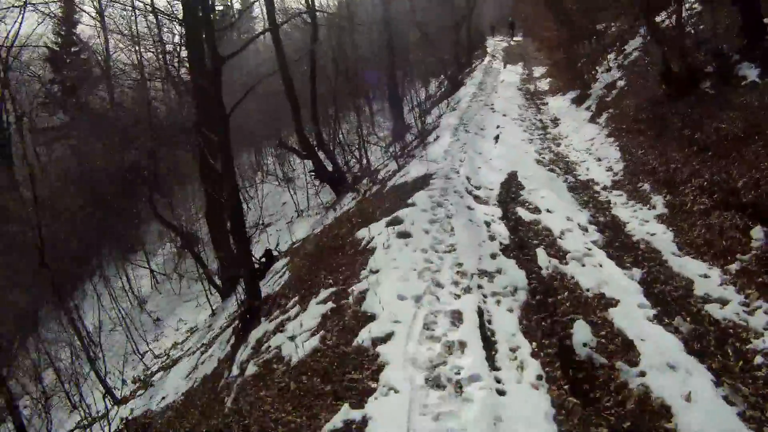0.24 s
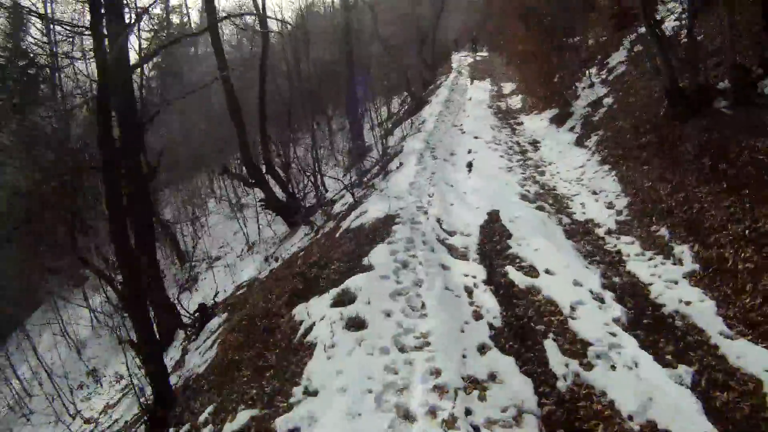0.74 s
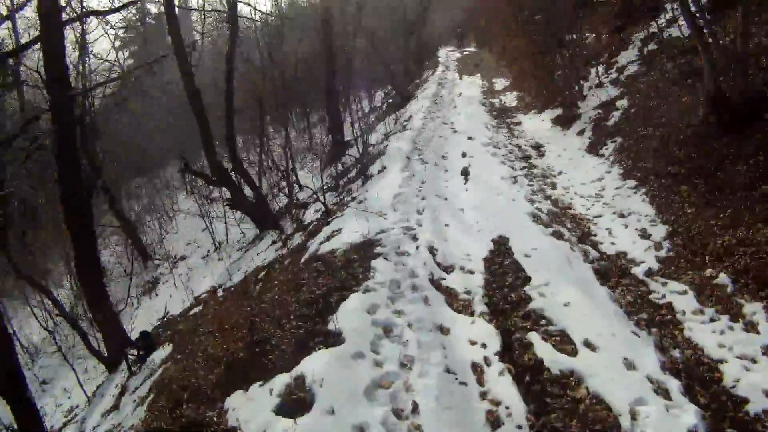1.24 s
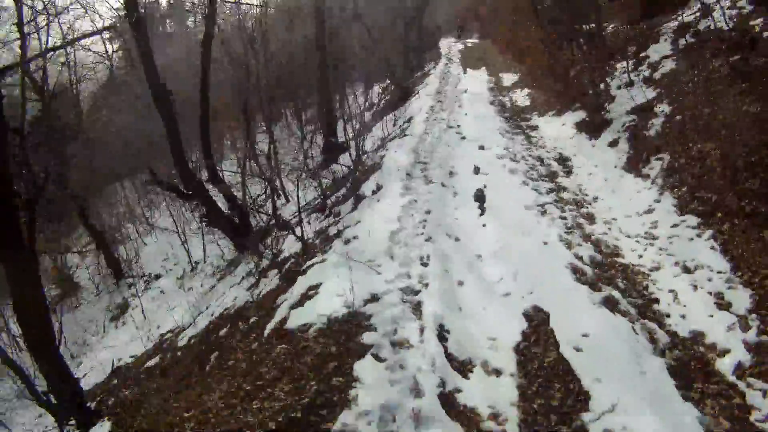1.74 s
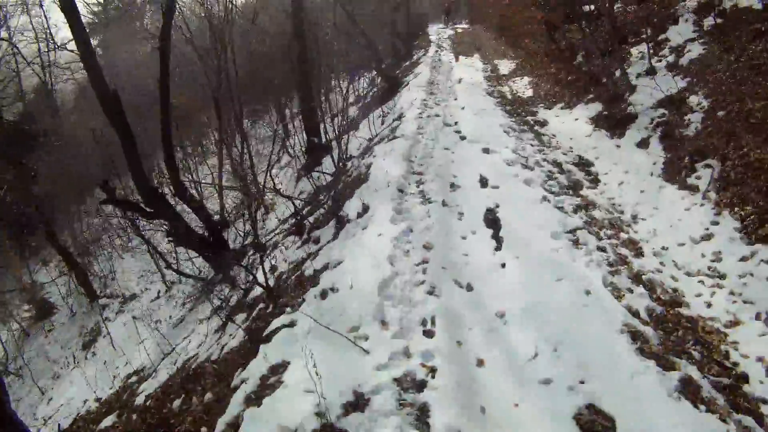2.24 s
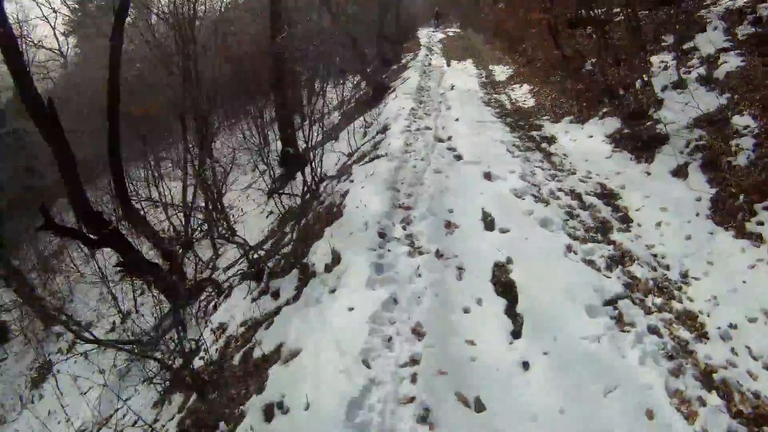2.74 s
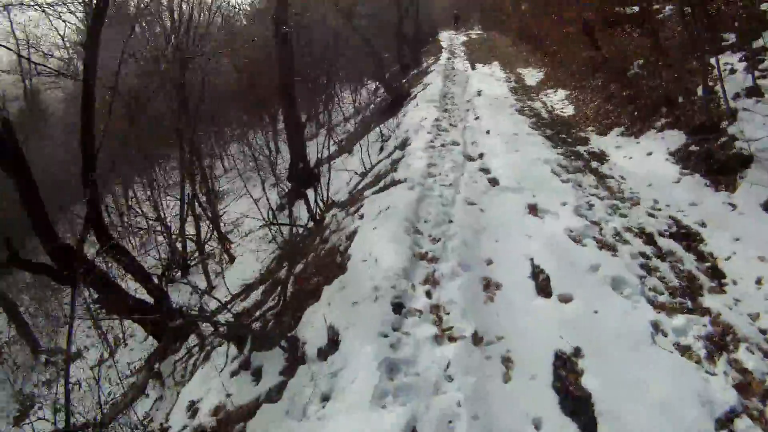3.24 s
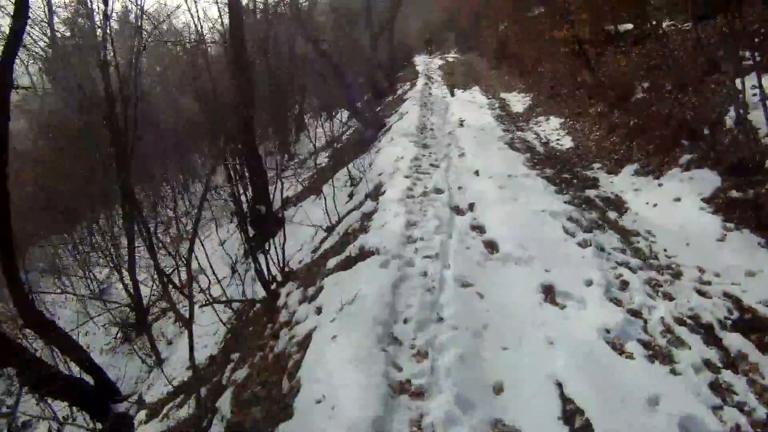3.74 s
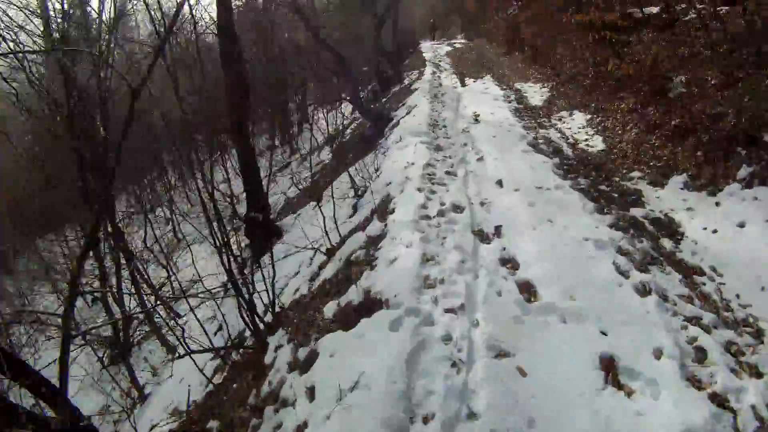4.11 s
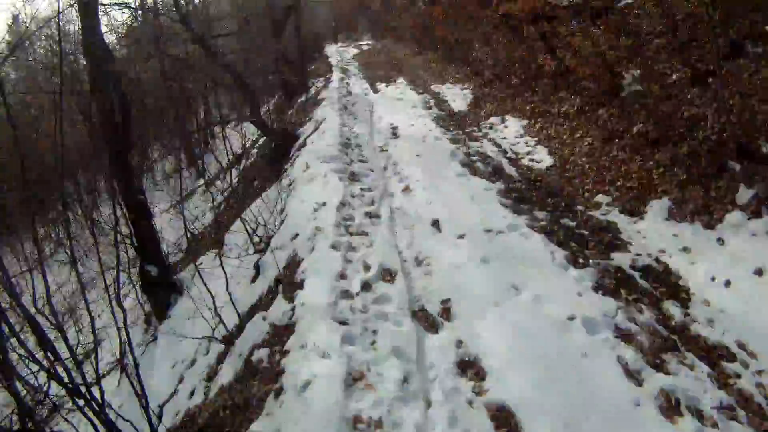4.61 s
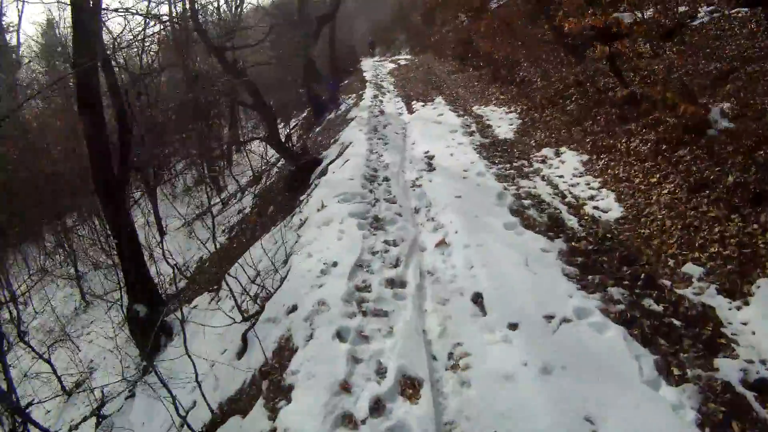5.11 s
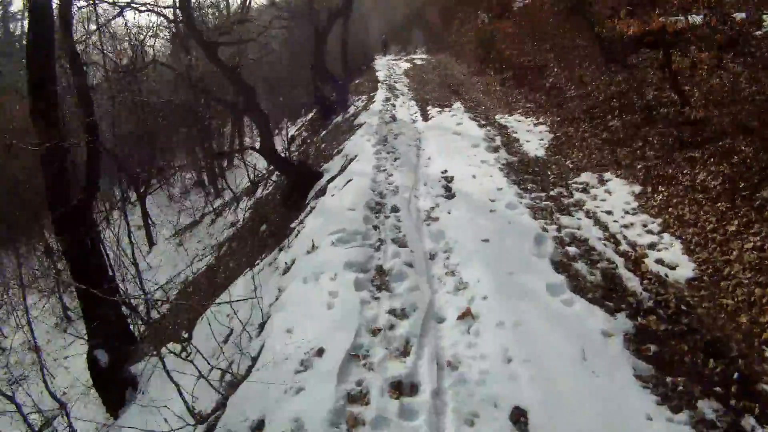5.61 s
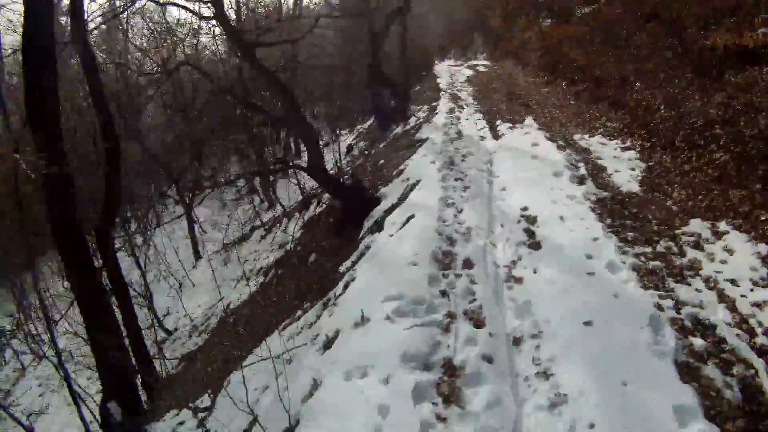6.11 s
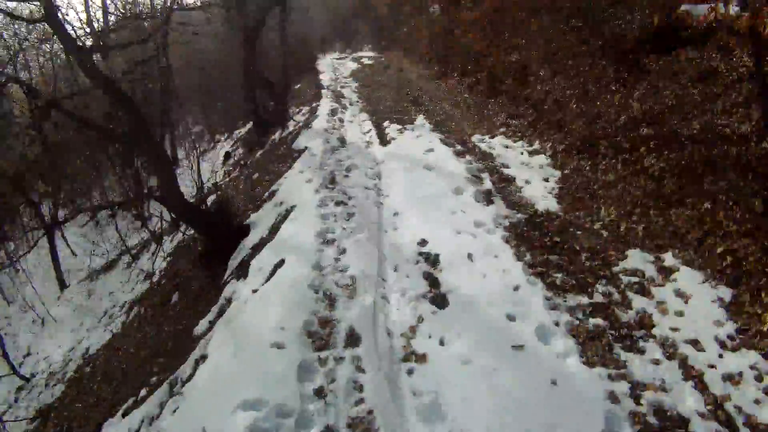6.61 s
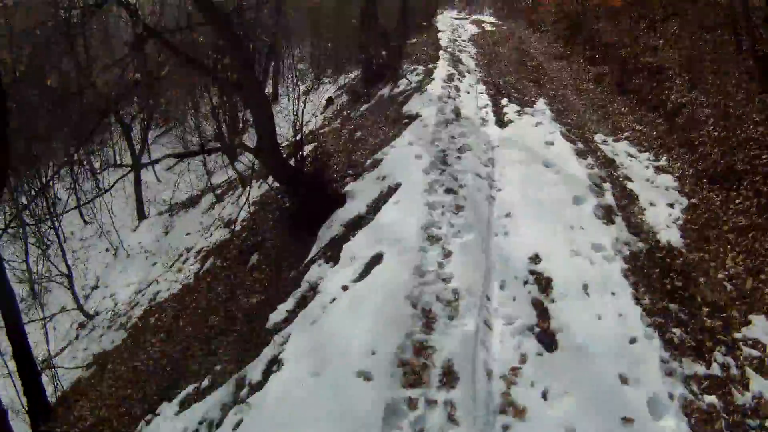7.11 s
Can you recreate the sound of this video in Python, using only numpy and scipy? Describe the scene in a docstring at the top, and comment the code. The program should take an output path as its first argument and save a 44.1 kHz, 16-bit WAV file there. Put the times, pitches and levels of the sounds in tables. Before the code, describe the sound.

Close, boxy and muffled sound from a bike-mounted camera: deep fluttering rumble and a soft rolling drone, grainy snow crunch with a thin crystal hiss that swells and eases. Small dry clicks and short rattles scatter throughout. Around four seconds the shaking is gentler; later it grows rougher, with padded knocks and thumps of the frame near the end.

```python
"""A low shudder and the crunch of tyres: a bicycle rolls on thin, trodden snow, heard inside a closed plastic case.
Shaped low noise shakes the camera's mount and drones through the frame; random cracks make crunch and hiss.
Bits of grit tick and scrape, and a loose fitting clacks through damped modes.
Later the frame knocks dully, most often towards the end, as padded blows ring its low modes."""
import sys
import numpy as np
from scipy import signal
from scipy.fft import rfft, irfft, next_fast_len
from scipy.io import wavfile
from scipy.ndimage import uniform_filter1d

SR = 44100
rng = np.random.default_rng(int(sys.argv[2]) if len(sys.argv) > 2 else 0)


def generate_wav(signal):
    """Clip the signal to [-1, 1] and save it as 16-bit WAV at the path in sys.argv[1]."""
    frames = np.transpose(np.atleast_2d(signal))
    scaled = np.clip(frames, -1, 1) * 32767
    pcm = np.round(scaled).astype(np.int16)
    wavfile.write(sys.argv[1], SR, pcm)


N = 324576
T = np.arange(N) / SR
SIZE = 2 * next_fast_len(N // 2 + SR)  # padded, so that filter tails do not wrap round
FREQ = np.arange(SIZE // 2 + 1) * SR / SIZE

# Event and mode levels below are relative: layer gains and the case still act on them.
# bumps in the trail: [full strength from t/s, length/s, sway level/dB, bounce relative to sway/dB]
BUMPS = [(0.0, 0.1, -39.5, -0.5), (0.178, 0.052, -40, 0.5), (0.485, 0.056, -44, -7),
         (0.556, 0.11, -45.5, 0.5), (0.91, 0.038, -42, -5.5), (1.094, 0.039, -41, -8),
         (1.309, 0.13, -41, 3), (1.498, 0.054, -43.5, -1), (1.738, 0.031, -41, -7.5),
         (1.919, 0.082, -39, 0.5), (2.13, 0.27, -45.5, -0.5), (2.547, 0.079, -39, 5), (2.7, 0.11, -44, -1),
         (2.867, 0.083, -42.5, -1), (3.231, 0.11, -40.5, 0), (3.453, 0.055, -45, -0.5),
         (3.682, .12, -42, -3.5), (4.007, 0.044, -52.5, 4), (4.287, 0.11, -52.5, 1),
         (4.475, 0.056, -39.5, -1), (4.703, 0.076, -44.5, 3.5), (4.82, 0.091, -48.5, 1),
         (5.056, .1, -51.5, 4), (5.317, 0.13, -47, 0.5), (5.633, 0.1, -44.5, -4), (5.97, 0.18, -42.5, -6),
         (6.346, 0.091, -37.5, -3.5), (6.52, 0.055, -42.5, -5.5), (6.68, 0.091, -40.5, 0),
         (6.797, .25, -36.5, -1.5), (7.108, 0.095, -43.5, 0)]
BUMP_ATTACK_S, BUMP_RELEASE_S = 0.037, 0.035
SMOOTH_SWAY_DB, SMOOTH_BOUNCE_DB = -53, -55.5  # shaking on the even snow, before the mount's gains
# spectrum of the swaying camera: [f/Hz, level/dB]
SWAY_COLOUR = [(4, -17), (12, 12.5), (19, 2.5), (28, -4.5), (45, -7.5), (58, -19), (80, -19.5), (200, -48),
               (600, -62)]
# spectrum of the bouncing mount: [f/Hz, level/dB]
BOUNCE_COLOUR = [(30, -23), (55, -5), (68, -0.5), (77, 3), (90, -9.5), (110, -21), (150, -27.5),
                 (260, -34.5), (600, -45.5), (2000, -92)]
# dull drone of the rolling wheels, carried up through the frame: [f/Hz, level/dB]
DRONE_COLOUR = [(60, 0.5), (130, 3.5), (260, -4.5), (450, -6), (800, -8), (1300, -17.5), (3000, -51)]
# how hard the tyres bite into the snow: [t/s, crunch level/dB, crystal hiss level/dB]
BITE = [(0.0, -55.5, -65), (0.09, -49, -58), (0.33, -56, -66.5), (0.66, -60.5, -68), (1.03, -56, -64),
        (1.24, -53, -64), (1.5, -54, -63.5), (1.9, -47.5, -55.5), (2.08, -53, -58), (2.82, -50, -58),
        (3.08, -59.5, -69), (3.33, -51, -59.5), (3.6, -61, -67), (4.1, -62.5, -68.5), (4.24, -54.5, -62.5),
        (5.6, -55.5, -62), (6.78, -48, -55), (7.36, -61, -66.5)]
PRESS_DB = -34.5  # a bump of this sway doubles the power of the crunch
# spectrum of the crunch before the case: [f/Hz, level/dB]
SNOW_COLOUR = [(60, -8), (200, -5.5), (550, -3.5), (1200, 0.5), (2200, -5), (3000, -9.5), (5000, -20),
               (10000, -13.5), (15400, -26)]
# spectrum of the crystal hiss before the case: [f/Hz, level/dB]
HISS_COLOUR = [(300, -20), (1500, -6), (3300, 0), (7500, -2.5), (10000, -12.5), (15400, -16.5)]
# lumps of snow giving way under a tyre: [t/s, level/dB, length/s, centre f/Hz]
SCRUNCHES = [(0.073, -53, 0.018, 1610), (0.177, -52, 0.011, 1700), (0.323, -46, 0.0045, 730),
             (0.349, -54.5, 0.0065, 640), (.428, -55.5, 0.015, 2000), (0.971, -57, 0.019, 1700),
             (1.189, -46.5, 0.0036, 2020), (1.224, -45, 0.0083, 1930), (1.344, -52, 0.0077, 1710),
             (1.469, -51.5, 0.008, 1660), (2.306, -54, 0.016, 1700), (2.553, -50, 0.022, 1790),
             (2.869, -53, 0.017, 1300), (3.878, -60.5, 0.016, 1620), (4.01, -59, 0.0084, 1590),
             (4.489, -57.5, 0.009, 1500), (4.724, -61, 0.0092, 1590), (5.01, -56, 0.0046, 1910),
             (5.111, -47.5, 0.0041, 1900), (5.955, -51, 0.01, 1540), (5.992, -58, .02, 1560),
             (6.863, -50, 0.0071, 1490)]
# grit and ice flicked against the bike: [t/s, level/dB, scrape length/s]
GRIT = [(0.131, -40, 0.0068), (0.1825, -36.5, 0.008), (1.0734, -32, 0.011), (1.2075, -32, 0.0091),
        (1.277, -38.5, 0.007), (1.3274, -33, 0.0057), (1.4309, -29, 0.0056), (1.5563, -34, 0.01),
        (1.5621, -27.5, 0.0067), (1.9593, -34, 0.0064), (1.9626, -29.5, 0.0067), (2.2069, -32, 0.0089),
        (2.5206, -30.5, 0.0069), (2.83, -54, 0.0069), (3.4625, -37.5, 0.008), (4.0002, -39.5, 0.0096),
        (4.452, -35.5, 0.006), (4.602, -45, 0.008), (4.6286, -29.5, 0.0066), (4.6345, -35, 0.0078),
        (5.2934, -36, 0.008), (5.6825, -32, 0.015), (6.2063, -29.5, 0.0089), (6.504, -24, 0.015),
        (6.55, -46, 0.0073), (6.769, -28.5, 0.0056), (6.9106, -19, 0.0079), (7.11, -33, 0.013),
        (7.1144, -29, 0.0075), (7.224, -27.5, 0.009)]
# spectrum of the grit before the case: [f/Hz, level/dB]
GRIT_COLOUR = [(60, -35), (200, -14), (550, -12), (1200, -4.5), (3000, -1), (7500, -1.5), (10000, -13),
               (15400, -17.5)]
# clacks of the loose fitting: [t/s, level/dB]
CLACKS = [(0.167, -44), (0.2837, -43.5), (0.4457, -36), (0.532, -34.5), (0.5611, -41), (0.656, -32.5),
          (0.7123, -43.5), (0.9129, -38), (1.1162, -37), (1.1875, -44), (1.207, -33), (1.221, -37),
          (1.254, -28.5), (1.338, -33), (1.3836, -40), (1.5282, -41), (1.6163, -39), (1.6553, -35),
          (1.8515, -44), (1.9121, -26), (2.088, -31), (2.158, -28), (2.3036, -37), (2.3347, -27.5),
          (2.8313, -40.5), (2.975, -40), (3.176, -30.5), (3.4645, -39), (3.5679, -33.5), (3.6798, -43),
          (3.8656, -44), (3.9588, -39.5), (4.2393, -28), (4.3575, -36.5), (4.8402, -34), (5.011, -38.5),
          (5.3411, -31.5), (5.545, -33), (5.898, -30.5)]
# modes of the loose fitting: [f/Hz, level/dB, t60/s]
FITTING = [(256, -13.5, 0.027), (1027, -11, 0.029), (1307, -7.5, 0.029), (1605, -10.5, 0.037),
           (1926, -8, 0.018), (2330, -11, 0.0067), (2910, -2.5, 0.0059), (3314, -16, 0.027),
           (4400, -13.5, 0.0022), (9130, -10, 0.0055), (10136, -18.5, 0.019), (10680, -17.5, 0.028),
           (13260, -23, 0.031), (14100, -21.5, 0.021)]
# dull knocks of the frame over bumps: [t/s, knock level/dB, low thump level/dB]
KNOCKS = [(2.861, -41, -56), (3.321, -41.5, -67), (5.113, -33.5, -53), (5.378, -40.5, -66),
          (5.408, -35.5, -62), (5.693, -36.5, -53), (5.997, -41, -47), (6.3959, -24.5, -44.5),
          (6.688, -38, -34.5), (6.773, -34, -43), (6.806, -39, -60), (6.848, -31, -35.5), (6.862, -41, -44),
          (6.984, -30, -42), (7.092, -39, -51)]
# modes of the frame knock: [f/Hz, level/dB, t60/s]
FRAME = [(840, -6.5, 0.0079), (973, 0, 0.016), (1104, 0, 0.013)]
THUMP_HZ, THUMP_T60 = 272, 0.053
# resonances and hollows of the camera case: [f/Hz, width/Hz, level/dB]
CASE = [(257.3, 88, 6.5), (963, 180, 3), (1287, 323, 10.5), (2047, 635, 13), (3540, 210, 5.5),
        (4680, 630, 5), (6020, 670, -18.0), (7280, 146, 4), (9960, 380, 11.5), (10770, 100, 11),
        (11520, 360, -19), (12600, 670, -16), (13450, 110, 14), (14100, 1100, 9.5)]
TOP_HZ = 15500


def undb(db):
    """Decibels to gain."""
    return 10 ** (np.asarray(db) / 20)


def unit(x):
    """Scaled to a standard deviation of 1."""
    return x / np.std(x)


def curves(table):
    """Each column of a table joined by straight lines in time."""
    times, *columns = np.transpose(table)
    return [np.interp(T, times, column) for column in columns]


def slope(points):
    """A spectrum in dB, drawn between its points on a logarithmic frequency scale."""
    hz, db = np.transpose(points)
    return np.interp(np.log(FREQ + 1), np.log(hz), db)


def response(db):
    """Causal frequency response with the given gain, from its folded cepstrum."""
    cepstrum = irfft(np.log(undb(db)))
    cepstrum[1:SIZE // 2] *= 2
    cepstrum[SIZE // 2 + 1:] = 0
    return np.exp(rfft(cepstrum))


def through(x, h):
    """Sound passed through a frequency response."""
    return irfft(rfft(x, SIZE) * h)[:N]


def flutter(rate):
    """Random levels held for 1 / rate s and smoothed twice; spread 1."""
    hold = int(SR / rate)
    steps = np.repeat(rng.standard_normal(N // hold + 1), hold)
    slewed = uniform_filter1d(uniform_filter1d(steps, hold), hold)
    return unit(slewed[:N])


def grains(per_s, spread_db):
    """Random impulses, mostly small and a few large."""
    size = undb(spread_db * np.minimum(rng.exponential(size=N), 4))
    fires = rng.random(N) < per_s / SR
    return fires * size * rng.standard_normal(N)


def jolt(start, length):
    """A bump builds quickly, lasts while the wheels cross it, then dies away."""
    rise = np.clip((T - start) / BUMP_ATTACK_S + 1, 0, 1)
    return rise * np.exp(-np.maximum(T - start - length, 0) / BUMP_RELEASE_S)


def shaking():
    """Strength of the sway and of the bounce: bumps add in power to the tremor of rolling."""
    sway_power, bounce_power = undb(SMOOTH_SWAY_DB) ** 2, undb(SMOOTH_BOUNCE_DB) ** 2
    for start, length, db, bounce_db in BUMPS:
        bump = undb(db) * jolt(start, length)
        sway_power = sway_power + bump ** 2
        bounce_power = bounce_power + (bump * undb(bounce_db)) ** 2
    return np.sqrt(sway_power), np.sqrt(bounce_power)


def rocking(colour):
    """Low random motion, its swing evened out so that it seldom dies away by chance."""
    noise = signal.hilbert(rng.standard_normal(SIZE))
    spectrum = np.fft.fft(noise)[:len(FREQ)] * undb(slope(colour))
    motion = np.fft.ifft(spectrum, SIZE)[:N]
    swing = np.sqrt(uniform_filter1d(np.abs(motion) ** 2, size=4200))  # over about 95 ms
    return unit(motion.real / swing)


def mount(sway, bounce, sway_db=5, bounce_db=0):
    """The rolling and its bumps sway the camera, which also bounces on its springy mount."""
    swaying = rocking(SWAY_COLOUR) * sway * undb(sway_db)
    bouncing = rocking(BOUNCE_COLOUR) * bounce * undb(bounce_db)
    return swaying + bouncing


def drone(sway, level_db=-67, bump_db=-28, waver_db=1.5):
    """The rolling wheels drone softly through the frame, more so over a bump."""
    noise = unit(through(rng.standard_normal(N), response(slope(DRONE_COLOUR))))
    level = np.hypot(undb(level_db), sway * undb(bump_db))
    return noise * level * undb(waver_db * flutter(rate=19))


def tyres(crunch_db, hiss_db, crunch_gain_db=-6.5, hiss_gain_db=0.0,
          clump_db=1.5, own_db=1.97, patchy_db=2.6, split_hz=1650):
    """Snow clumps break in tiny cracks, soft ones low and icy ones high; crystals hiss more evenly."""
    clumps = clump_db * flutter(rate=30)
    colour = response(slope(SNOW_COLOUR))
    soft = 1 / (1 + (FREQ / split_hz) ** 8)
    crunch = 0
    for share in (soft, 1 - soft):
        level_db = clumps + own_db * flutter(rate=60) + patchy_db * flutter(rate=140)
        cracks = grains(per_s=2200, spread_db=2.0) * undb(level_db)
        crunch = crunch + through(cracks, colour * np.sqrt(share))
    crystals = grains(per_s=12000, spread_db=3) * undb(clumps / 2 + patchy_db * flutter(rate=70))
    hiss = through(crystals, response(slope(HISS_COLOUR)))
    return unit(crunch) * undb(crunch_db + crunch_gain_db) + unit(hiss) * undb(hiss_db + hiss_gain_db)


def scrunch(per_s=1300, width=0.4):
    """Each lump collapses in a short run of cracks; softer snow sounds lower."""
    out = np.zeros(N + SR)
    t = np.arange(-SR // 20, SR // 20) / SR
    for s, db, length, hz in SCRUNCHES:
        cracks = rng.standard_normal(len(t)) * (rng.random(len(t)) < per_s / SR)
        edges = [hz / (1 + width), hz * (1 + width)]
        band = signal.butter(2, edges, "bandpass", fs=SR, output="sos")
        collapse = unit(signal.sosfilt(band, cracks)) * np.exp(-np.abs(t) / length)
        start = max(int((s + t[0]) * SR), 0)
        out[start:start + len(t)] += undb(db) * collapse
    return out[:N]


def contact(events, clean_db, glance, lead):
    """Force of (t/s, level/dB, length/s) contacts: hard ones strike cleanly, light ones scrape."""
    push = np.zeros(N + SR)
    t = np.arange(-SR // 50, SR // 20) / SR
    for s, db, length in events:
        # the scrape builds faster than it fades: lead is the ratio of the two times
        envelope = np.exp(-2 * np.maximum(t, -t / lead) / length)
        scrape = rng.standard_normal(len(t)) * envelope
        share = 1 / (1 + undb(glance * (db - clean_db)) ** 2)  # power in the scrape, half at clean_db
        force = np.sqrt(share) * scrape / np.linalg.norm(scrape) + np.sqrt(1 - share) * (t == 0)
        start = max(int((s + t[0]) * SR), 0)
        push[start:start + len(t)] += undb(db) * force
    return push[:N]


def grit(crunch_db, gain_db=15, spray_db=-2, clean_db=-23):
    """Each bit of grit ticks or scrapes briefly; finer spray comes off the tyres all along."""
    hits = undb(gain_db) * contact(GRIT, clean_db, glance=0.4, lead=0.29)
    spray = grains(per_s=16, spread_db=1) * undb(crunch_db + spray_db)
    return through(hits + spray, response(slope(GRIT_COLOUR)))


def ring(push, modes, vary_db=0):
    """A force rings damped modes, neighbours in opposite senses; shares shift with the contact point."""
    t, out = T[:SR // 10], 0
    for k, (hz, db, t60) in enumerate(modes):
        decay = np.exp(-np.log(1000) * t / t60)
        tone = (-1) ** k * undb(db) * decay * np.cos(2 * np.pi * hz * t)
        drive = push * undb(vary_db * flutter(rate=20))
        out = out + signal.oaconvolve(drive, tone)[:N]
    return out


def fitting(crunch_db, gain_db=-1.5, chatter_db=-7, clean_db=-36, length=0.0091, tick_db=-8):
    """The loose fitting strikes and buzzes briefly, and chatters faintly with the rolling."""
    clacks = [(s, db, length) for s, db in CLACKS]
    push = contact(clacks, clean_db, glance=0.42, lead=0.42)
    chatter = grains(per_s=34, spread_db=3.5) * undb(crunch_db + chatter_db)
    force = undb(gain_db) * push + chatter
    body = ring(force, FITTING, vary_db=1.0)
    # the contact itself adds a bright tick, 1 ms later
    tick = signal.sosfilt(signal.butter(2, 3500, "highpass", fs=SR, output="sos"), force)
    return body + undb(tick_db) * np.roll(tick, SR // 1000)


def blows(times, db):
    """One impulse of force for each blow."""
    push = np.zeros(N)
    at = np.clip((np.asarray(times) * SR).astype(int), 0, N - 1)
    np.add.at(push, at, undb(db))
    return push


def swell(s, length):
    """A short exponential rise and fall around a moment."""
    return np.exp(-np.abs(T - s) / length)


def frame(knock_db=1, thump_db=-1, judder_db=-29, length=0.0092):
    """Padded blows, with a judder around each, ring the frame's low modes and thump the case."""
    times, knock, thump = np.transpose(KNOCKS)
    judder_level = sum(undb(db + judder_db) * swell(s, length) for s, db in zip(times, knock))
    judder = rng.standard_normal(N) * judder_level
    knocking = ring(blows(times, knock + knock_db) + judder, FRAME)
    thumping = ring(blows(times, thump + thump_db), [(THUMP_HZ, 0, THUMP_T60)])
    padding = signal.butter(2, 1800, fs=SR, output="sos")
    return signal.sosfilt(padding, knocking + thumping)


def scene():
    """Bumps shake the mount and press the tyres into the snow; all is heard through the case walls."""
    sway, bounce = shaking()
    press_db = 10 * np.log10(1 + (sway / undb(PRESS_DB)) ** 2)
    crunch_db, hiss_db = curves(BITE) + press_db
    snow = tyres(crunch_db, hiss_db) + scrunch()
    bike = mount(sway, bounce) + drone(sway) + grit(crunch_db) + fitting(crunch_db) + frame()
    case_db = sum(db * np.exp(-2 * ((FREQ - hz) / width) ** 2) for hz, width, db in CASE)
    return through(snow + bike, response(case_db))[None]


def record(dry):
    """The camera cuts the top with a steep low-pass."""
    return signal.sosfilt(signal.ellip(8, .2, 70, TOP_HZ, fs=SR, output="sos"), dry)


dry = scene()
out = record(dry)
generate_wav(out)
```